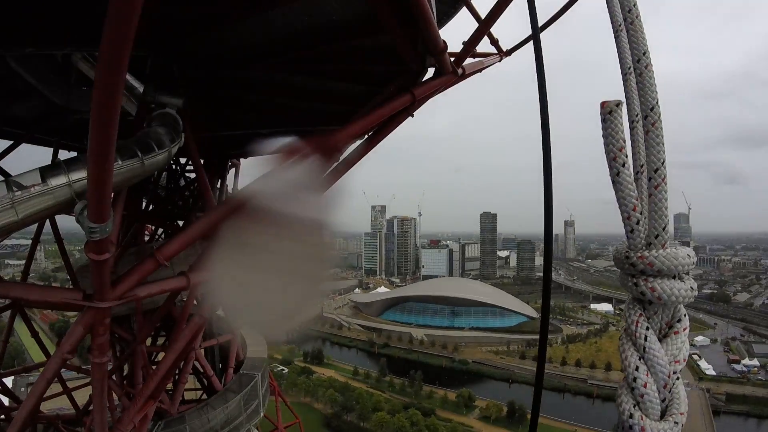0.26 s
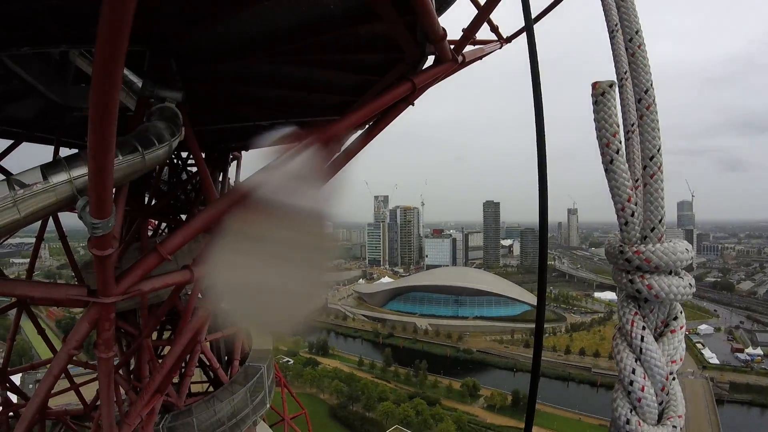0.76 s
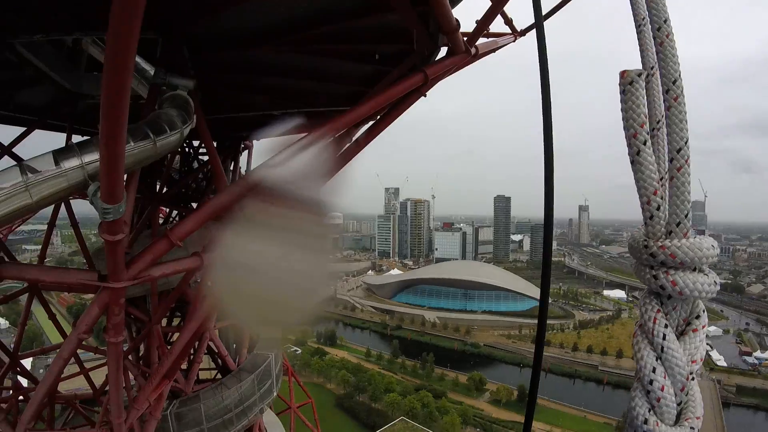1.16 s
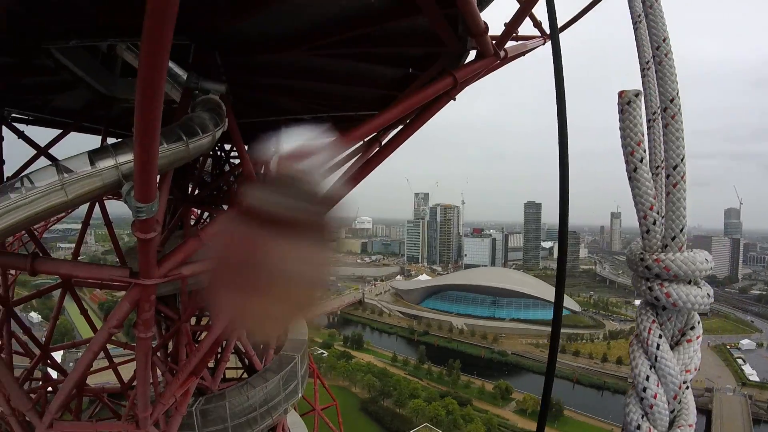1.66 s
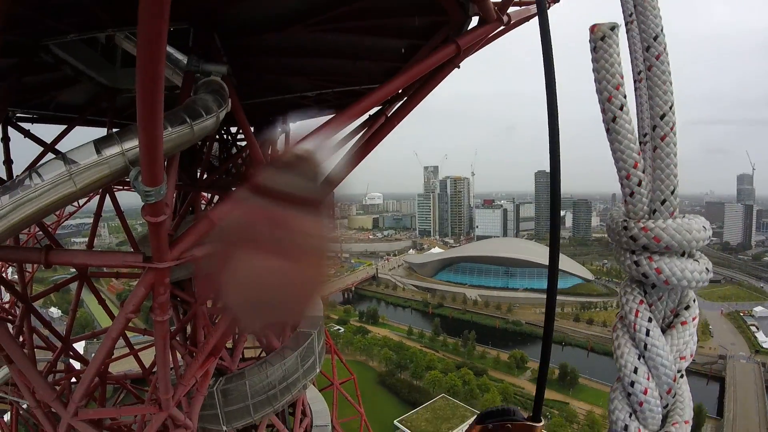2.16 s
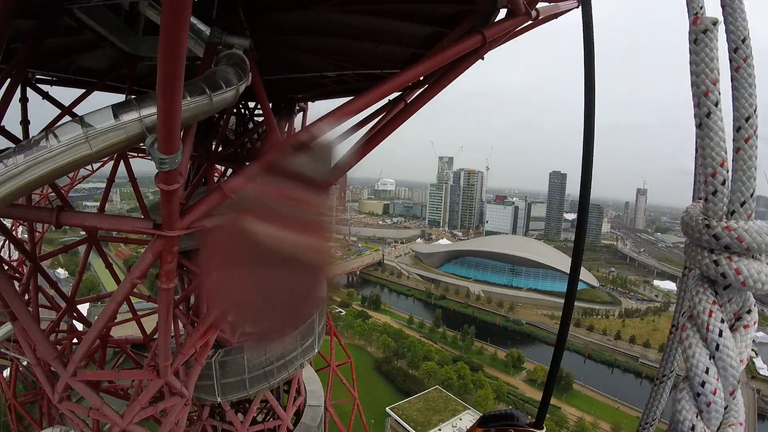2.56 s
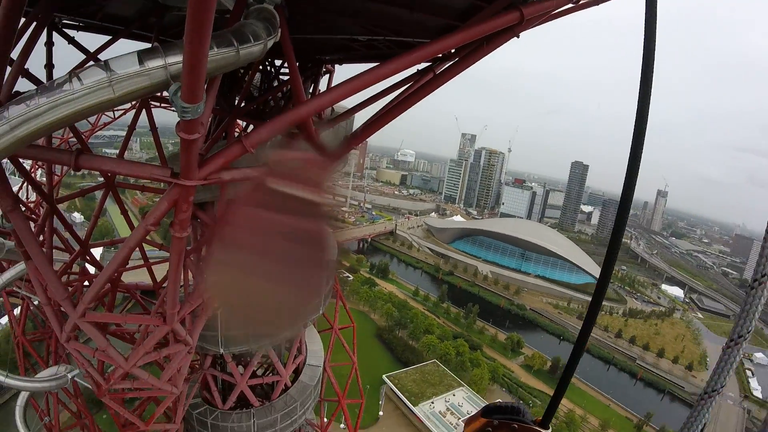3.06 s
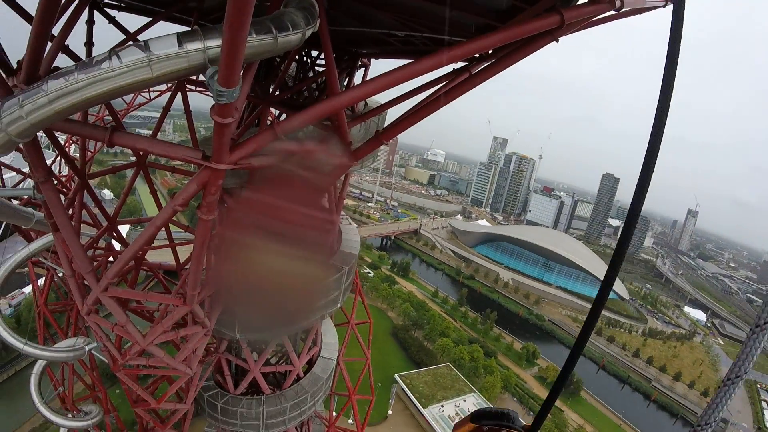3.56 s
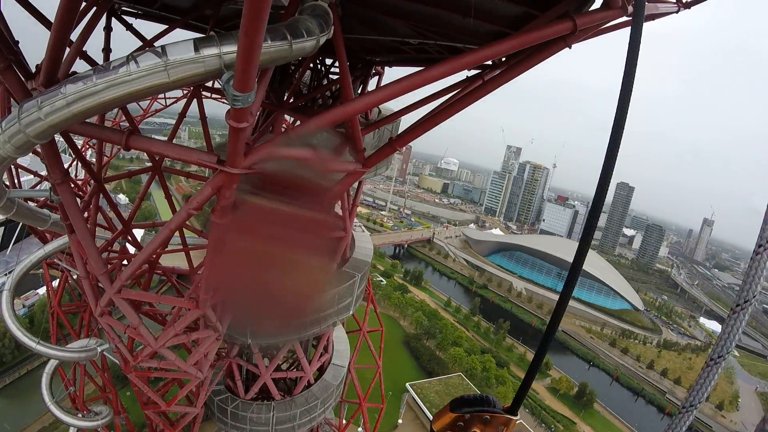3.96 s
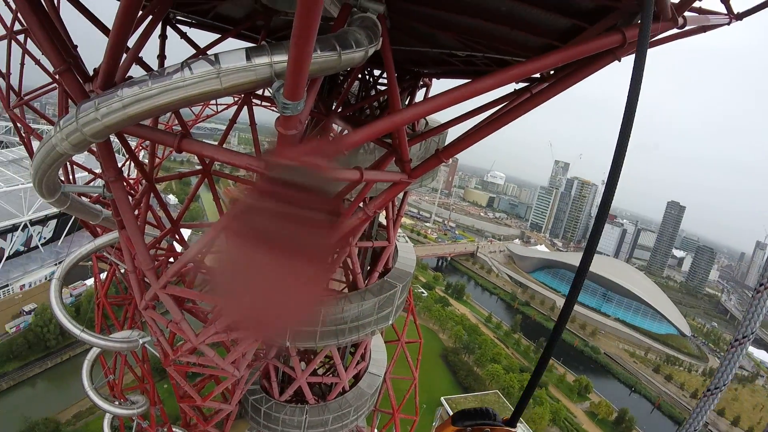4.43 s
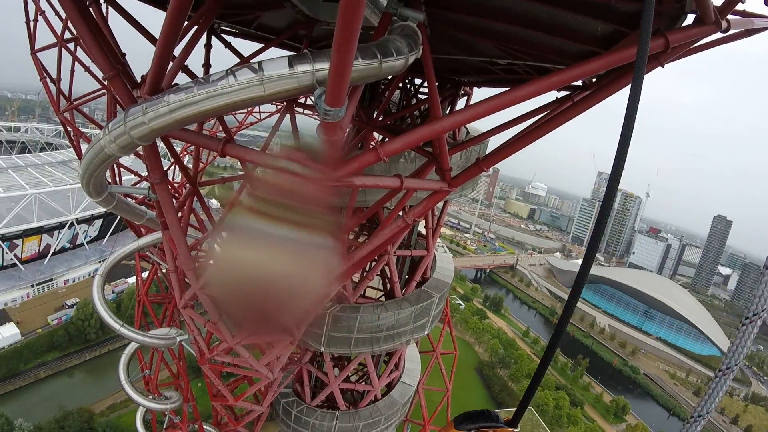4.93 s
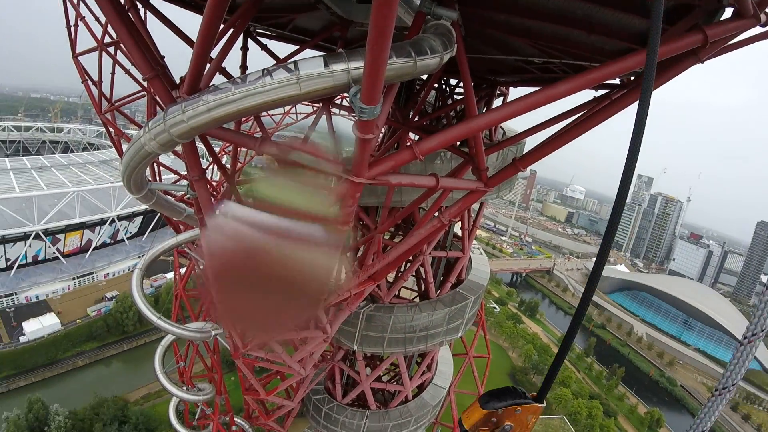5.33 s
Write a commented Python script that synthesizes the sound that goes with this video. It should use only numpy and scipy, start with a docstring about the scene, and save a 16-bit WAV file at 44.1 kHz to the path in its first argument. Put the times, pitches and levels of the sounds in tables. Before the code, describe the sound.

Light rain falls on a small hard camera case in open air, heard very close in mono with no echo. Throughout, quiet wind buffeting, a low rumble and a soft, even rain hiss lie beneath a busy patter of tiny droplets that thins slightly. Distinct drops tick irregularly from the start, each only milliseconds long, some dry and plasticky, others splashier; stronger ones hit near 0.5 and 1.0 seconds. From about 2 seconds, short breathy swishes of air slide downward, and dull low thuds come from the shaken mount. At 3.0 seconds one drop cracks far louder than everything else, with another firm tick just after. Very faint, thin high whines then hang in the hiss. A deeper bump lands at 4.0, a bright sharp snap at 4.6, then sparser ticks, more faint whines after 5.0, and a strong lower-pitched knock at 5.5 as it ends.

```python
"""Light rain falls on the hard case of a camera carried high up on an open steel tower.
From the start, shaped noise gives buffeting wind, a low rumble and the hiss of rain all around.
Drops tick the case at once: a contact and a noise splash drive its resonances, over a bed of droplets.
After two seconds air swishes past as sinking bands of noise, and the mount thuds as short, low swings.
After three seconds faint thin whines, narrow bands of noise, hang in the hiss."""
import sys
import numpy as np
from scipy import signal
from scipy.fft import irfft
from scipy.io import wavfile
from scipy.ndimage import uniform_filter1d

SR = 44100
rng = np.random.default_rng(int(sys.argv[2]) if len(sys.argv) > 2 else 0)


def waveform_to_disk(signal):
    """Save audio, clipped to [-1, 1], as 16-bit WAV at the path in sys.argv[1]."""
    frames = np.transpose(np.atleast_2d(signal))
    scaled = np.clip(frames, -1, 1) * 32767
    samples = np.round(scaled).astype(np.int16)
    wavfile.write(sys.argv[1], SR, samples)


N = 246519

# wind buffeting the case, before its layer gain: (time [s], level [dB])
BUFFET_LEVEL = [(0.0, -56), (0.86, -60.5), (1.1, -54.5), (1.54, -58.5), (1.93, -55.5), (2.21, -48.5),
                (3.01, -51), (3.16, -53), (3.43, -61), (3.55, -56), (3.91, -54.5), (4.09, -48.5),
                (4.19, -52), (4.39, -54), (4.66, -62), (5.59, -51.5)]
# body of the rumble, before its layer gain: (time [s], level [dB])
RUMBLE_LEVEL = [(0.0, -59.5), (0.56, -62), (2.41, -57.5), (2.63, -59.5), (3.14, -56.5), (3.64, -59.5),
                (3.91, -57.5), (5.59, -60.5)]
# relative spectra of buffeting, rumble and rain hiss: (frequency [Hz], density [dB per Hz])
BUFFET_SPECTRUM = [(3, 2.5), (12, 1.5), (25, -1.5), (42, -18), (65, -29), (110, -29), (200, -26),
                   (600, -69)]
RUMBLE_SPECTRUM = [(60, 0), (84, 1), (110, 0.5), (170, -6), (240, -7), (310, -10), (345, -8.5), (380, -1),
                   (430, -4.5), (500, -13.5), (700, -20.5), (1100, -35), (3000, -48.5)]
HISS_SPECTRUM = [(400, -5.5), (800, -5), (1150, -5.5), (1310, 0.5), (1420, -5.5), (1900, -1), (2250, -7),
                 (3400, -9), (4200, -18), (7300, -22), (8500, -26.5), (10000, -25), (12000, -35.5),
                 (15000, -47)]
# the distinct drops:
# (time [s], relative strength [dB], note of the spot [Hz], share of the blow's energy in splash [0-1])
DROPS_ON_CASE = [(0.044, -2.5, 2400, 0.4), (0.0775, 2.5, 2850, 0.05), (0.1547, -5.5, 2260, 0.4),
                 (0.324, -1.5, 2400, 0.76), (0.482, 10.5, 2280, 0.18), (0.5907, -8, 1700, 0.7),
                 (0.611, -6.5, 2430, 0.3), (0.678, -3.5, 2220, 0.32), (0.7531, -7.5, 2000, 0.4),
                 (0.9784, 10.5, 3100, 0.01), (1.0188, 5.5, 2590, 0.44), (1.1, -6, 1830, 0.5),
                 (1.1376, 0, 3050, 0.03), (1.164, 2, 1840, 0.9), (1.188, -0.5, 2660, 0.34),
                 (1.271, -5, 1920, 0.5), (1.396, -6, 1960, 0.7), (1.432, 0, 2230, 0.84),
                 (1.478, -2.5, 1660, 0.04), (1.7627, -1.5, 2700, 0.93), (1.84, 2.5, 2170, 0.53),
                 (2.0588, -6.5, 3090.0, 0.1), (2.0856, 3, 1490, 0.4), (2.374, 0.5, 2350, 0.65),
                 (2.5756, -3.5, 2530, 0.83), (2.601, 6, 3220, 0.04), (2.8187, 0, 2520, 0.04),
                 (3.0075, 30, 2620, 0.03), (3.0508, -1.5, 2530, 0.95), (3.0898, 11.5, 1720, 0),
                 (3.235, -1, 2220, 0.36), (3.2776, -5.5, 1970, 0.63), (3.346, -8, 2880, 0.05),
                 (3.4054, -11.5, 3030, 0), (3.4246, 2, 1720, 1), (3.4343, 4, 3060, 0.08),
                 (3.4611, -10, 3600, 0.02), (3.5199, -1, 1800, 0.28), (3.538, 3, 1960, 0.95),
                 (3.6127, 0.5, 1550, 0.86), (3.85, 3, 3700, 0.05), (3.8646, 0.5, 4400, 0.13),
                 (4.0754, 1.5, 1750, 0.98), (4.1684, -2, 2220.0, 0.06), (4.5095, -6.5, 2470, 0.26),
                 (4.619, 19.5, 4600, 0.05), (4.721, -1, 2390.0, 1), (4.9942, 2, 3540, 0.23),
                 (5.1702, -6.5, 2020, 0.94), (5.3035, -1.5, 3020, 0.06), (5.489, 16.5, 1380, 0.05),
                 (5.5205, -3.5, 3830.0, 0.65)]
# resonances of the case: (frequency [Hz], width [Hz], relative level [dB])
CASE_MODES = [(1463, 145, -0.5), (1950, 338, -6), (2530, 288, -8.5), (3237, 250, -19), (3840, 330, -22.5),
              (4520, 290, -23.5), (5600, 470, -22.5), (6200, 550, -18), (7330, 380, -18.5),
              (8360, 520, -28.5), (10500, 730, -52), (13300, 1400, -41)]
# colour of a blow that is all splash, as water cushions the contact: (frequency [Hz], gain [dB])
SPLASH_COLOUR = [(1430, -10.6), (1870, 2.5), (2590, -0.3), (3800, 4.4), (7000, -25)]
# weak, longer ringing of the stiff parts: (frequency [Hz], relative level [dB], 60 dB decay time [s])
STIFF_RINGING = [(1400, -44, 0.047), (1700, -43, 0.065), (1930, -49, 0.15), (2404, -40, 0.081),
                 (2790, -49, 0.11), (5380, -28.5, 0.033)]
# puffs of air past the case: (time [s], length [s], starting frequency [Hz], level before fades [dB])
AIR_PUFFS = [(2.046, 0.064, 2660, -48.5), (2.146, 0.022, 1680, -46), (2.217, 0.048, 2860, -50.5),
             (2.25, 0.077, 1740, -55.5), (2.375, 0.048, 2610, -50.5), (2.404, .1, 1450, -60.5),
             (2.658, 0.069, 1360, -56.5), (2.818, 0.043, 2880, -50.5), (2.955, 0.049, 2600, -50),
             (3.704, 0.038, 2230, -55), (4.081, 0.031, 2240, -51), (5.262, 0.049, 1600, -56.5),
             (5.353, 0.048, 2620, -52.5)]
# bumps of the camera on its mount: (time [s], peak level [dB])
MOUNT_BUMPS = [(2.048, -40), (2.079, -38), (2.15, -40.5), (2.395, -36), (2.537, -35.5), (2.627, -36),
               (2.673, -39), (2.72, -39), (2.747, -39.5), (3.084, -35), (3.385, -36.5), (4.002, -27.5),
               (4.125, -39), (5.294, -37.5), (5.391, -41.5), (5.478, -38)]
# thin whines: (start [s], end [s], frequency [Hz], resonator width [Hz], level before fades [dB])
THIN_WHINES = [(3.05, 3.7, 2812, 20, -68), (3.7, 5.45, 2812, 18, -73), (5.01, 5.58, 3440, 100, -68),
               (5.15, 5.47, 3935, 22, -74), (5.02, 5.47, 4565, 22, -82), (5.1, 5.48, 6180, 110, -80)]

# a blow drives the resonances near the note of its spot hardest
SPOT_DB, SPOT_OCTAVES = 6.5, 0.28
# a short contact lifts the treble: small drops, and stiff spots with a high note
# STIFF_TILT_DB: dB per octave above the knee, for each octave of the note above the knee
# TILT_PER_SIZE: dB per octave lost for each dB above the usual size
KNEE_HZ, STIFF_TILT_DB, TILT_PER_SIZE, USUAL_SIZE_DB = 3300, 3.5, 0.17, 8.5
# every puff sinks toward the same low note and fades as it goes
SINK_TO_HZ, SINK_S, PUFF_FADE_DB = 1240, 0.045, -3
MOUNT_HZ = 108.3
EDGE_HZ = 15900  # upper band limit


def gain_of(db):
    """Decibels to gain."""
    return 10 ** (np.asarray(db) / 20)


def evened(x):
    """Scales to rms 1."""
    return x / np.sqrt(np.mean(x ** 2) + 1e-20)


def read(points, hz):
    """Reads a spectrum on a log-frequency axis."""
    f, value = np.transpose(points)
    return np.interp(np.log(hz + 1), np.log(f + 1), value)


def follow(curve):
    """Turns a level curve into a gain for every sample."""
    return gain_of(np.interp(np.arange(N) / SR, *np.transpose(curve)))


def add(mix, s, sound):
    """Mixes a sound in at time s."""
    part = mix[max(round(s * SR), 0):][:len(sound)]
    part += sound[:len(part)]


def resonate(x, hz, width):
    """A resonance of gain 1: shifts hz down to zero, smooths, and shifts back, so hz may glide."""
    turn = np.exp(2j * np.pi * np.cumsum(hz * np.ones(len(x))) / SR)
    r = np.exp(-np.pi * width / SR)
    return 2 * (turn * signal.lfilter([1 - r], [1, -r], x / turn)).real


def noise(spectrum, patchy_db, size):
    """Noise of a given spectrum whose level drifts in patches of time and frequency."""
    hz = np.fft.rfftfreq(size, 1 / SR)
    a, b, patches = rng.standard_normal((3, len(hz), 4 * N // size + 5))
    for axis in (0, 1):
        patches = uniform_filter1d(patches, size=9, axis=axis)
    level_db = read(spectrum, hz)[:, None] + patchy_db * evened(patches)
    frames = (a + 1j * b) * gain_of(level_db)
    return evened(signal.istft(frames, nperseg=size, noverlap=size - size // 4)[1][:N])


def outdoors(buffet_db=5, rumble_db=6, hiss_db=-58.5):
    """Wind pressure, low rumble and the even hiss of rain all around, each as shaped noise."""
    buffet = gain_of(buffet_db) * follow(BUFFET_LEVEL) * noise(BUFFET_SPECTRUM, patchy_db=0.5, size=8192)
    rumble = gain_of(rumble_db) * follow(RUMBLE_LEVEL) * noise(RUMBLE_SPECTRUM, patchy_db=1.5, size=2048)
    hiss = gain_of(hiss_db) * noise(HISS_SPECTRUM, patchy_db=0.6, size=1024)
    return buffet + rumble + hiss


def case_response(size_db, spot_hz, splash, detune, stiff_hz=850, bend_hz=2000, bend_width_hz=1400, size=2048):
    """The tick of the case for one blow: its resonances, each driven as hard as the spot and the water allow."""
    hz = np.fft.rfftfreq(size, 1 / SR)
    # neighbouring resonances swing against each other, which leaves dips between them
    modes = 0
    for (centre_hz, width_hz, db), shift in zip(CASE_MODES, detune):
        away = (hz - centre_hz * (1 + shift)) / width_hz
        skirt = 1 / np.hypot(1, away / 3.5)  # steepens the far flanks
        modes = modes + gain_of(db) / (1 + 2j * away) * skirt
    stiffness = hz ** 2 / (hz ** 2 + stiff_hz ** 2)  # the small, stiff wall passes little bass

    near_spot = np.exp(-(np.log2((hz + 1) / spot_hz) / SPOT_OCTAVES) ** 2)
    tilt_db = STIFF_TILT_DB * np.log2(spot_hz / KNEE_HZ) - TILT_PER_SIZE * (size_db - USUAL_SIZE_DB)
    treble_db = tilt_db * np.log2(np.maximum(hz / KNEE_HZ, 1))
    cushion_db = np.sqrt(splash) * read(SPLASH_COLOUR, hz)
    gain = abs(modes) * stiffness * gain_of(SPOT_DB * near_spot + treble_db + cushion_db)

    # minimum phase: the energy comes as early as this spectrum allows
    log_gain = np.log(np.maximum(gain, gain.max() * 1e-4))
    mirrored = np.r_[log_gain, log_gain[-2:0:-1]]
    causal = np.exp(np.conj(signal.hilbert(mirrored)))[:len(hz)]
    # bending waves spread on their way through the wall, so the tick takes a cycle or two to peak
    spread = bend_hz ** 2 - hz ** 2 + 1j * hz * bend_width_hz
    return irfft(causal * np.conj(spread) / spread)


def drop(db, spot_hz, splash, splash_s=0.0018, wet_detune=0.085, size=700):
    """A sharp contact, then a few milliseconds of splash, both heard through the case."""
    t = np.arange(size) / SR
    splash = np.clip(splash, 0, 1)
    # splashy drops land in lying water, which shifts the resonances a little each time
    detune = wet_detune * splash * rng.standard_normal(len(CASE_MODES))
    tick = case_response(db, spot_hz, splash, detune)
    spray = evened(rng.standard_normal(size) * t * np.exp(-t / splash_s))
    force = np.sqrt(splash / size) * spray
    force[0] += np.sqrt(1 - splash)
    sound = signal.fftconvolve(force, tick)
    # the splash keeps the energy of the bare tick
    return gain_of(db) * sound * np.linalg.norm(tick) / np.linalg.norm(sound)


def rain_on_case(ring_db=-15.0):
    """The distinct drops strike the case and leave a faint ringing of decaying sines."""
    ticks, t = np.zeros(N), np.arange(SR // 5) / SR
    for s, db, spot_hz, splash in DROPS_ON_CASE:
        add(ticks, s, drop(db, spot_hz, splash))
    ring = sum(gain_of(db - 60 * t / t60) * np.sin(2 * np.pi * hz * t) for hz, db, t60 in STIFF_RINGING)
    return ticks + gain_of(ring_db) * signal.fftconvolve(ticks, ring)[:N]


def drizzle(level_db=-19, spread_db=3.5, shelter_db=-7, spot_hz=2300, scatter_octaves=0.51,
            least_splash=0.47, count=130):
    """Small droplets splash on random spots, a few of them larger, all more weakly as the camera turns away."""
    out = np.zeros(N)
    for k, (slot, rank, spot, wet) in enumerate(rng.random((count, 4))):
        when = (k + slot) / count  # share of the scene gone by
        weight = min(-np.log(1 - rank), 3)  # mostly small, seldom large
        db = level_db + spread_db * weight + shelter_db * (when - 0.5)
        note_hz = spot_hz * 2 ** (scatter_octaves * (2 * spot - 1))
        splash = least_splash + (1 - least_splash) * wet
        add(out, when * N / SR, drop(db, note_hz, splash))
    return out


def swishes(width_share=0.28, ragged_db=2.0):
    """Each ragged puff of air excites a broad resonance that slides down as the puff dies."""
    out = np.zeros(N)
    for s, length, start_hz, db in AIR_PUFFS:
        n = int(length * SR)
        t = np.arange(n) / SR
        hz = SINK_TO_HZ + (start_hz - SINK_TO_HZ) * np.exp(-t / SINK_S)
        width = width_share * start_hz ** 2 / 2000  # higher puffs are broader still
        ragged = evened(uniform_filter1d(rng.standard_normal(n), size=200))
        eddies = gain_of(ragged_db * ragged + PUFF_FADE_DB * t / length)
        air = resonate(resonate(eddies * rng.standard_normal(n), hz, width), hz, width)
        add(out, s, gain_of(db) * evened(air) * signal.windows.tukey(n, 0.5))
    return out


def mount(rise_s=0.0063, decay_s=0.017):
    """The camera rocks for a few cycles on its springy mount after each bump."""
    out, t = np.zeros(N), np.arange(SR // 6) / SR
    envelope = (1 - np.exp(-(t / rise_s) ** 2)) * np.exp(-t / decay_s)
    swing = -np.sin(2 * np.pi * MOUNT_HZ * t) * envelope
    for s, db in MOUNT_BUMPS:
        add(out, s, gain_of(db) * swing / abs(swing).max())
    return out


def whines():
    """Faint, unsteady tones: noise squeezed through two narrow resonances in a row."""
    out = np.zeros(N)
    for start, end, hz, width, db in THIN_WHINES:
        n = int((end - start) * SR)
        tone = resonate(resonate(rng.standard_normal(n), hz, width), hz, width)
        add(out, start, gain_of(db) * evened(tone) * signal.windows.tukey(n, 0.15))
    return out


def scene():
    """Everything that reaches the one microphone."""
    layers = outdoors() + rain_on_case() + drizzle() + swishes() + mount() + whines()
    return layers[None]


def record(dry):
    """Clips peaks at full scale, then rolls off everything above the band limit."""
    band_limit = signal.firwin(255, EDGE_HZ, window=("kaiser", 8), fs=SR)
    return signal.oaconvolve(np.clip(dry, -1, 1), band_limit[None], "same")


dry = scene()
out = record(dry)
waveform_to_disk(out)
```